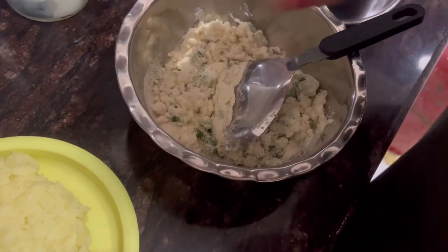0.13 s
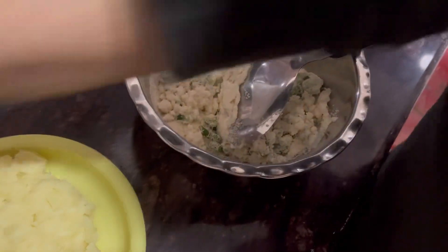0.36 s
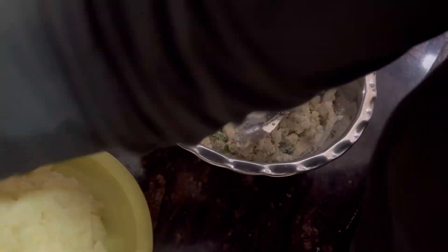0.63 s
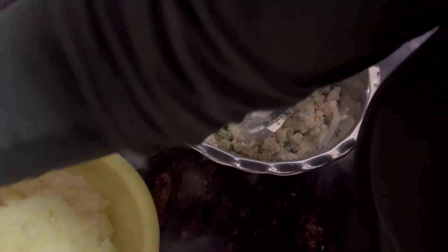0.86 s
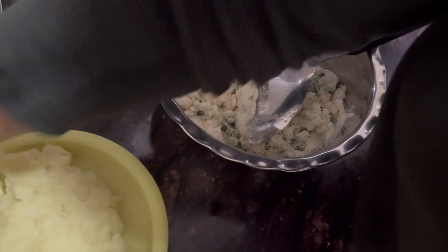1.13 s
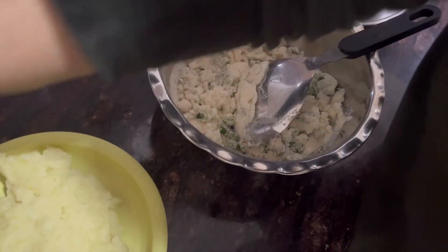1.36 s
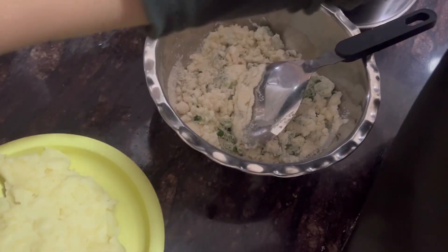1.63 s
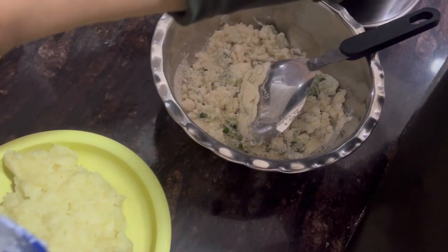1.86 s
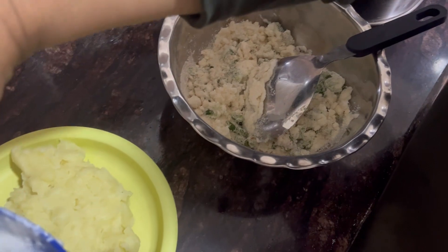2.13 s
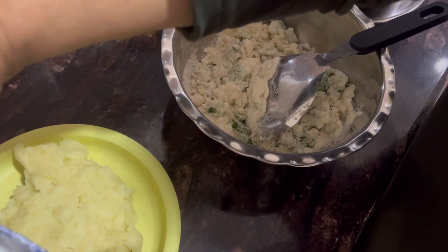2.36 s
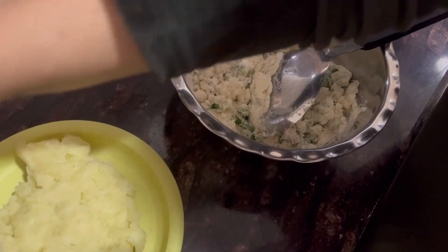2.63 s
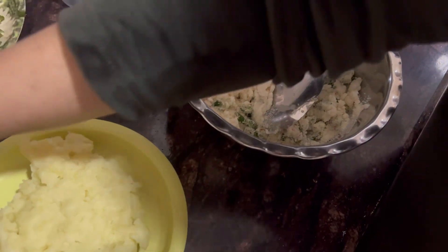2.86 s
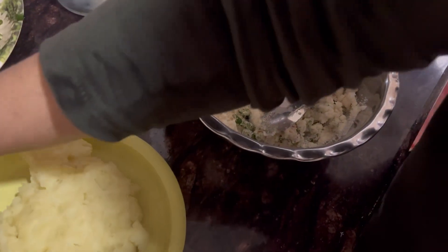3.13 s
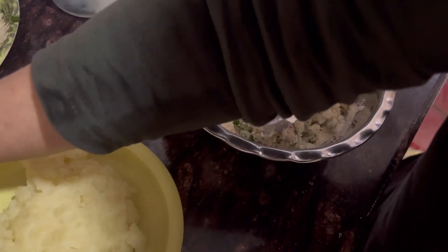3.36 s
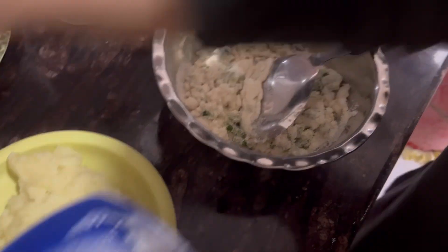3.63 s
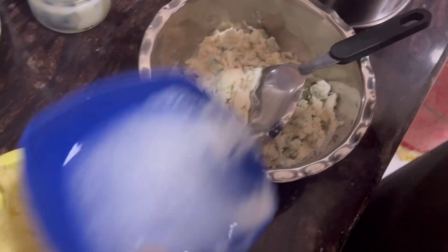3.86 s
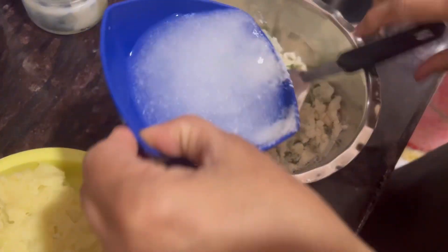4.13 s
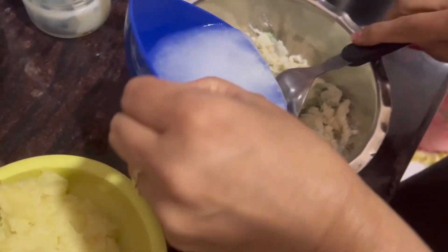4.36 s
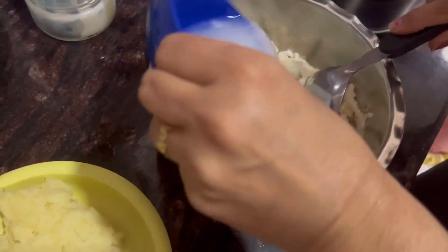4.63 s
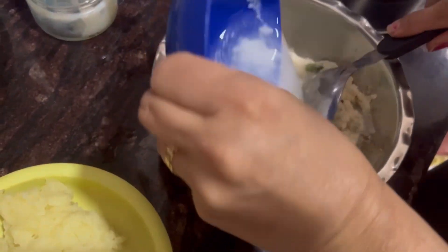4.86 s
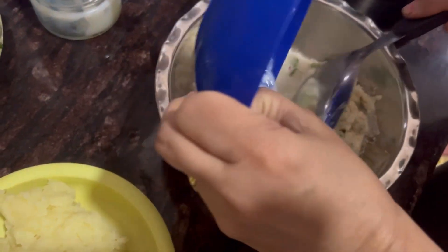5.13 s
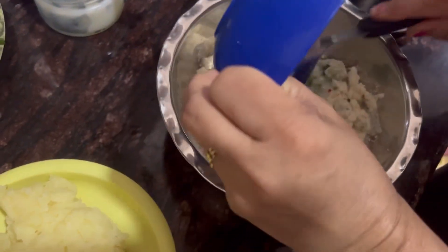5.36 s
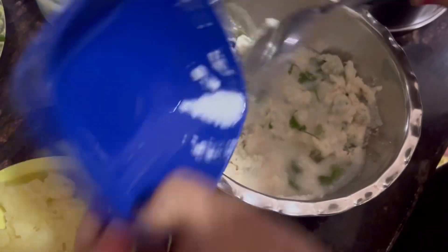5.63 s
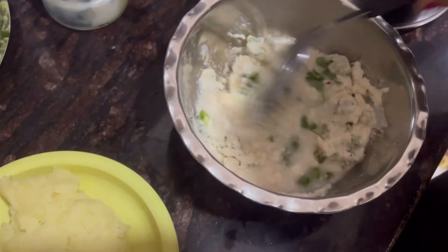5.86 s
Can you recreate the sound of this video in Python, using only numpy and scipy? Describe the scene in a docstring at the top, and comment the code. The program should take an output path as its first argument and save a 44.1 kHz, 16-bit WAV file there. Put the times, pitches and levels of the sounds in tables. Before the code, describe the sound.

In a small hard kitchen, vessels are handled near the microphone. First comes a sharp metallic knock, then a lighter cup clink, a sharp dull clack and a thin, fizzy trickle with a short squeak. Later a steel lid is struck, a spoon scrapes and taps faintly in the bowl, liquid plops in again, and containers thump on stone. Soft pot bubbling and low rumble run underneath.

```python
"""A hard steel clink and knock at once, close by on a stone counter: modes rung by blows, noise bursts, clacks.
Under it from the start: a simmering pot (resonant grains, swelling tones), rumble, rubbing and rustle (noise).
Then a cup clinks, liquid trickles (short tones, ticks, grains of fizz) and a dragged bowl squeaks (stick-slip
partials); a spoon rubs and taps, a lid is struck, thuds and pours recur. A hard-walled room echoes it (noise tail)."""
import sys
import numpy as np
from scipy import signal
from scipy.fft import rfft, irfft, next_fast_len
from scipy.io import wavfile

SR = 44100
rng = np.random.default_rng(int(sys.argv[2]) if len(sys.argv) > 2 else 0)


def elevation(decibels):
    """Turn decibel levels (scalar or array-like) into linear amplitude ratios."""
    levels = np.asarray(decibels, float)
    return 10 ** (levels / 20)


def inscribe(sig):
    """Save sig as 16-bit PCM at rate SR to the path in sys.argv[1].

    A 1-D sig is mono; a 2-D sig holds one channel per row.
    Samples are clipped to [-1, 1] before scaling.
    """
    pcm = np.round(np.clip(np.atleast_2d(sig).T, -1, 1) * 32767)
    wavfile.write(sys.argv[1], SR, pcm.astype(np.int16))


N = 264114

# noise colours of rumble, hiss and vessels rubbing on stone: f/Hz, relative density/dB per Hz
RUMBLE_COLOUR = [(30, -28), (60, -9), (115, 1), (170, -11), (270, -11), (450, -7), (620, -11.5), (800, -21)]
HISS_COLOUR = [(2600, 6), (4000, -13.5), (5000, -3), (7000, 1.5), (9000, -7), (12000, -2), (16000, -12.5)]
RUB_COLOUR = [(600, 9), (900, 5.5), (1300, -0.5), (1700, -4.5), (2300, -1.5), (3300, -12), (4300, -9.5)]
# share of diffuse sound common to both sides: f/Hz, share/0-1
COMMON_SHARE = [(60, 1), (200, 0.96), (500, 0.76), (1200, 0.02), (3000, 0), (7000, 0.8), (12000, 1)]
# phase by which the left port leads: f/Hz, phase/rad
PORT_LEAD = [(200, 0), (340, -.3), (690, -2.6), (1290, -.2), (1980, .1), (3190, -1.3), (4050, -.7),
             (4910, -2.2), (5600, 0), (7400, -.1), (9400, -1.1), (11900, -2.7), (14000, -2.85),
             (16200, -3.5)]
# decay of the kitchen: f/Hz, t60/s
ROOM_T60 = [(100, 1.4), (1000, 0.63), (4000, 0.47), (10000, 0.22)]
# shifts of vessels by hand: t/s, time to fade 20 dB/s, rubbing level/dB, low thrum through the stone level/dB
HAND_SHIFTS = [(0.0, 0.26, -42, -32.5), (.27, 0.42, -52, -41), (.7, 0.37, -51.5, -44),
               (1.05, 0.6, -60, -50.5), (1.49, 0.1, -53, -59), (1.861, .15, -40, -50),
               (2.04, 0.1, -50, -57.5), (2.44, 0.03, -60, -57), (2.91, 0.6, -69, -56),
               (3.212, 0.33, -41, -45.5), (3.451, 0.98, -52.5, -53.5), (4.14, 0.27, -54.5, -52.5),
               (4.45, 0.23, -58, -51), (4.76, 0.9, -57, -48.5), (5.14, 0.54, -54, -56),
               (5.5, 0.4, -63, -46), (5.819, 0.2, -50.5, -50.5)]
# rustle of sleeve and skin near the microphone: t/s, relative level/dB
SLEEVE_RUSTLE = [(0, -67), (.46, -67), (.8, -74), (1.13, -72), (1.37, -67.5), (1.57, -83.5), (2.6, -71.5),
                 (2.92, -79), (3.3, -69), (3.54, -76.5), (3.87, -69.5), (4.09, -74.5), (4.19, -63),
                 (4.3, -71), (5.6, -70), (5.77, -57.5), (5.99, -63)]
# flow of each pour, as fizz: t/s, relative level/dB
POUR_FLOWS = [
    [(1.63, -85), (1.75, -54.5), (1.83, -63.5), (1.93, -47), (2.05, -56.5), (2.2, -57.5), (2.35, -65),
     (2.48, -60.5), (2.64, -82.5)],
    [(4.4, -76), (4.57, -61.5), (4.69, -62.5), (4.9, -52), (5.0, -57.5), (5.14, -58), (5.29, -70),
     (5.45, -76.5)],
]
# large bubbles in the pot, and at 3.208 s the low tone of the blow on the lid: t/s, peak level/dB, f/Hz
SWELLING_TONES = [(.603, -44, 478), (.699, -33, 467), (1.053, -36, 443), (1.156, -37.5, 433),
                  (1.434, -38.5, 465), (1.472, -41, 482), (1.647, -41.5, 483), (1.782, -42, 457),
                  (2.247, -43.5, 512), (2.411, -39.5, 467), (2.474, -38, 455), (2.54, -35, 468),
                  (2.584, -41, 449), (2.686, -43.5, 439), (2.75, -44, 454), (2.905, -37, 477),
                  (3.208, -26.5, 557), (3.25, -38, 417), (3.467, -36.5, 454), (3.631, -41, 464),
                  (3.76, -39, 428), (3.939, -35.5, 450), (4.322, -42, 465), (4.439, -41, 480),
                  (4.72, -35.5, 449), (4.813, -41.5, 444), (4.968, -38, 462), (5.02, -37, 467),
                  (5.392, -36.5, 483), (5.469, -38, 435), (5.675, -41, 450), (5.858, -30.5, 405)]
# thuds on the counter: t/s, relative level/dB
COUNTER_THUDS = [(0.011, -27), (0.264, -30), (0.291, -27.5), (1.485, -38), (3.214, -30), (4.069, -37.5),
                 (4.093, -40), (4.483, -33.5), (5.491, -22), (5.791, -32.5), (5.857, -19.5), (5.882, -28)]
# modes of the counter: f/Hz, relative level/dB, t60/s
COUNTER_MODES = [(70, -14, 0.2), (113.7, -2, 0.44), (161.3, -8.5, 0.38), (230.7, -7.5, 0.33),
                 (280, -6, .15), (385, -6, 0.077), (800, -16.5, 0.12)]
# hard contacts: t/s, length/s, f/Hz, peak level/dB
HARD_CONTACTS = [(.0131, 0.0034, 1270, -8), (0.014, 0.0026, 8400, -26), (1.486, 0.0023, 920, -23.5),
                 (1.4858, 0.0018, 3800, -27.5), (2.913, 0.0092, 1395, -50.5)]
# blows on the steel bowl: t/s, relative level/dB
BOWL_HITS = [(0.014, -7), (0.031, -18)]
# modes of the bowl: f/Hz, relative level/dB, t60/s
BOWL_MODES = [(810, -9.5, 0.055), (1047, -17.5, 0.2), (1293, -19.5, .1), (1582, -17.5, 0.13),
              (2292, -15, 0.11), (3157, -21, 0.14), (3950, -28.5, 0.26), (4610, -33, 0.4), (5580, -36, .1)]
# dull knocks: t/s, level/dB, f/Hz that scales the noise band, t60/s, bright snap relative to body/dB
DULL_KNOCKS = [(0.016, -9, 1271, 0.069, -29), (0.255, -29, 637, 0.04, -39), (0.29, -25.5, 598, 0.086, -17),
               (0.301, -34.5, 651, 0.059, -23), (0.704, -22, 1595, 0.023, -21),
               (1.022, -38, 643, 0.12, -19), (1.052, -33.5, 1230, 0.13, -18),
               (1.486, -12.5, 1070, 0.028, -3.5), (2.915, -44, 635, 0.031, -26),
               (3.208, -16, 1530, 0.11, -29.5), (3.222, -23.5, 3810, 0.029, -9),
               (4.128, -36.5, 1470, 0.043, -13), (4.898, -22, 1194, 0.022, 0),
               (4.904, -19, 910, 0.044, -27), (5.278, -27.5, 1160, 0.073, 3.5),
               (5.484, -35.5, 794, 0.072, -22.5), (5.857, -35.5, 786, 0.069, -21)]
# blows on the steel cup: t/s, relative level/dB
CUP_HITS = [(0.7, -17), (0.706, -14.5)]
# modes of the cup: f/Hz, relative level/dB, t60/s
CUP_MODES = [(1295, -7.5, 0.03), (1532, -11.5, 0.049), (1605, -3, 0.13), (2235, -9, 0.019), (2883, -18, .1),
             (3490, -6, 0.071), (3900, -4.5, 0.082), (4410, -15, 0.15), (7480, -19, 0.11)]
# single splashes: t/s, level/dB, starting f/Hz
SPLASHES = [(1.6713, -40.5, 5980), (1.6997, -45.5, 2630), (1.7017, -42.5, 5200), (1.7316, -34, 7230),
            (1.7351, -38.5, 1920), (1.7371, -40, 3860), (1.7631, -32, 6090), (1.7975, -37.5, 7240),
            (1.8444, -31, 3830), (1.8618, -34, 3770), (1.8903, -35.5, 7640), (1.9077, -36.5, 6940),
            (1.9207, -28, 6670), (1.9242, -31.5, 3640), (1.9472, -38.5, 5610), (1.9706, -30, 4030),
            (1.9726, -31.5, 7450), (1.9931, -36, 3580), (2.01, -37, 5320), (2.0297, -35.5, 1900),
            (2.031, -38.5, 4200), (2.0561, -39, 2380), (2.0614, -38.5, 7340), (2.0736, -38, 2060),
            (2.0739, -35, 3920), (2.0858, -30, 3760), (2.1215, -39, 2080), (2.1532, -38.5, 6740),
            (2.1549, -39, 1980), (2.1689, -35.5, 1883), (2.1841, -28.5, 8140), (2.1913, -39.5, 2300),
            (2.2056, -38, 3950), (2.2684, -47, 8060), (2.2994, -34.5, 8650), (2.3011, -45.5, 2750),
            (2.3303, -36.5, 7890), (2.3822, -33.5, 4730), (2.4143, -45.5, 1890), (2.4263, -43.5, 2440),
            (2.4532, -37, 1600), (2.4964, -23, 8670), (2.5358, -38.5, 5540), (2.6111, -36.5, 6280),
            (4.3288, -52, 8170), (4.5034, -45.5, 3710), (4.5408, -45.5, 8900), (4.5617, -44, 8370),
            (4.654, -46.5, 9520), (4.7159, -37, 3026), (4.7408, -35, 3370), (4.778, -37.5, 1410),
            (4.8281, -37, 6500), (4.8381, -38.5, 4100), (4.8481, -38.5, 3330), (4.89, -34.5, 7670),
            (4.896, -25, 894), (4.904, -34, 2660), (4.948, -40, 1180), (4.9698, -44, 6310),
            (4.9888, -42, 2580), (4.9987, -40, 3350), (5.031, -42.5, 2290), (5.0611, -42.5, 6850),
            (5.078, -40.5, 1450), (5.106, -28.5, 3540), (5.1389, -37, 3464), (5.1778, -41, 4160),
            (5.179, -33, 1148), (5.2113, -43.5, 3490), (5.258, -41, 2037), (5.2781, -37, 7500),
            (5.279, -28, 1153), (5.6577, -48, 8680), (5.7211, -49, 8030), (5.9147, -39.5, 8100)]
# squeaks of the bowl: t/s, length/s, mean slip rate/Hz, relative level/dB
BOWL_SQUEAKS = [(1.849, 0.052, 650, -30), (1.936, 0.016, 655, -42)]
# spoon rubbing along the bowl: start t/s, hold after the grip/s, level/dB
SPOON_RUBS = [(2.903, 0.039, -66.5), (3.995, 0.045, -67), (4.095, 0.11, -62.5), (4.375, 0.037, -67),
              (4.484, .1, -65), (5.55, 0.036, -62), (5.711, 0.23, -64)]
# light taps of the spoon: t/s, relative level/dB
SPOON_TAPS = [(4.1043, -50), (4.2238, -41), (4.4922, -48), (5.5633, -57.5), (5.7249, -49.5), (5.905, -40.5)]
# modes of the spoon: f/Hz, relative level/dB, t60 when tapped/s
SPOON_MODES = [(1293, -14.5, 0.069), (1662, 1.5, 0.075), (2300, -16, 0.1), (2794, -18.5, 0.13),
               (3155, -11, 0.21), (4600, -13, 0.16), (5740, -14.5, 0.083)]
# blows on the steel lid: t/s, relative level/dB
LID_HITS = [(3.2079, -22), (3.222, -26)]
# modes of the lid: f/Hz, relative level/dB, t60/s
LID_MODES = [(1006, 4, 0.052), (1320, -1.5, 0.087), (1477, 7.5, 0.024), (1695, -0.5, 0.16), (1820, 0, 0.1),
             (2380, -10, 0.11), (3117, -8, 0.071), (3824, -1, 0.1), (4330, 7, 0.055), (10100, -26, 0.13),
             (7553, -12, 0.18), (8500, -33, 0.1), (1766, -16, 1), (1970, -18.5, 0.69), (3076, -25, 1),
             (3620, -30.5, .9), (4250, -37, 0.67)]

# house and street; faintest rubbing; rise of a shift
RUMBLE_DB, STILL_DB, SHIFT_RISE_S = -54.5, -78, 0.033
HISS_SPLIT_DB = -66   # rustle or flow level above which hiss breaks into fizz
# small bubbles before the low-pass, their waver, swell of a large bubble
SIMMER_DB, SIMMER_WAVER_DB, BUBBLE_SWELL_S = -54, 2.0, .0053
STRIKE_SPREAD_DB = 1.5   # spread of a mode's strength from blow to blow
SMALL_DROPS_DB = 2   # relative to the flow
# splash t60 at 1 kHz, power of pitch that shortens it, tick relative to tone
DROP_T60_S, DROP_SHORTENING, TICK_DB = .036, .33, -14
GRIP_S, LET_GO_DB_PER_S = 0.015, 152   # spoon stroke


def rms_one(x):
    """Scale to rms 1."""
    return x / np.sqrt(np.mean(x ** 2) + 1e-20)


def in_time(rows, outside=None):
    """Columns of a curve at every sample."""
    s, *columns = np.transpose(rows)
    return [np.interp(np.arange(N) / SR, s, c, outside, outside) for c in columns]


def at_hz(points, hz):
    """Read a spectrum on a log axis."""
    point_hz, value = np.transpose(points)
    return np.interp(np.log(hz + 1), np.log(point_hz + 1), value)


def drift(rate_hz):
    """Slow random curve of rms 1: noise through two equal poles, at SR / 40."""
    r = np.exp(-80 * np.pi * rate_hz / SR)
    slow = signal.lfilter([1], [1, -2 * r, r * r], rng.standard_normal(N // 40 + 2002))[2000:]
    return np.interp(np.arange(N) / 40, np.arange(len(slow)), rms_one(slow))


def ring(clicks, hz, t60_s):
    """Two-pole resonance: a unit click sets a decaying sine of height 1 ringing."""
    r, w = elevation(-60 / (t60_s * SR)), 2 * np.pi * hz / SR
    return signal.lfilter([0, np.sin(w)], [1, -2 * r * np.cos(w), r * r], clicks + 1e-18)


def soften(x, hz):
    """One-pole low-pass."""
    r = np.exp(-2 * np.pi * hz / SR)
    return signal.lfilter([1 - r], [1, -r], x)


def steep(x, hz):
    """Sharp low-pass."""
    return signal.sosfilt(signal.butter(6, hz, fs=SR, output="sos"), x)


def band_pass(x, order, low_hz, high_hz):
    """Butterworth band-pass."""
    return signal.sosfilt(signal.butter(order, [low_hz, high_hz], "band", fs=SR, output="sos"), x)


def add(out, s, sound):
    """Mix a short sound in at a time."""
    at = round(s * SR)
    out[at:at + len(sound)] += sound[:N - at]


def to_sides(noises, hz):
    """Two sides from three noises: the first is common, by the share at this pitch."""
    share = np.clip(at_hz(COMMON_SHARE, hz), 0, 1)
    return np.sqrt(share) * noises[0] + np.sqrt(1 - share) * noises[1:]


def banded_noise(colour, patchy_db):
    """Half-octave bands of stereo noise, each flickering a little; rms 1."""
    out, together = 0, .4 * drift(5)
    white = rng.standard_normal((2, 3, N))
    octaves = np.log2(colour[-1][0] / colour[0][0])
    edges = colour[0][0] * 2 ** np.arange(0, octaves + .3, .5)
    for k, (low, high) in enumerate(zip(edges, np.minimum(edges[1:], 17000))):
        noises = band_pass(white[k % 2], 2, low, high)   # neighbours use separate noise
        hz = np.sqrt(low * high)
        gain = elevation(at_hz(colour, hz) + patchy_db * (together + drift(14)))
        out = out + gain * to_sides(noises, hz)
    return rms_one(out)


def grains(per_s, low_hz, high_hz, t60_cycles, spread_db, tilt):
    """Random clicks dealt to sixteen short resonances; rms 1."""
    happens = rng.random(N) < per_s / SR
    sizes = elevation(spread_db * np.minimum(rng.exponential(1, N), 4)) * happens
    dealt = rng.integers(0, 16, N)
    pitches = np.geomspace(low_hz, high_hz, num=16)
    return rms_one(sum(hz ** tilt * ring(sizes * (dealt == k), hz, t60_cycles / hz)
                       for k, hz in enumerate(pitches)))


def struck(blows, modes, gain_db, split):
    """Each blow strikes every mode with its own strength; out of round, modes are close pairs that beat."""
    blow_s, blow_db = np.transpose(blows)
    at, out = np.array([round(s * SR) for s in blow_s]), np.zeros(N)
    chance = rng.standard_normal((len(blows), len(modes)))
    for k, (hz, level_db, t60) in enumerate(modes):
        clicks = np.zeros(N)
        late = round(SR / 3000 * (k % 3))   # the blow reaches parts of the wall one after another
        strength_db = blow_db + level_db + gain_db + STRIKE_SPREAD_DB * chance[:, k]
        clicks[at + late] = (-1) ** k * elevation(strength_db)
        rocking = elevation(2.7 * drift(25))   # the vessel rocks and is damped unevenly
        out += rocking * (ring(clicks, hz, t60) + 0.33 * ring(clicks, hz * (1 + split), t60))
    return out


def stroke(s, rise_s, hold_s, fall_db_per_s):
    """Gain that rises, holds and dies away."""
    t = np.arange(N) / SR - s
    return np.clip(t / rise_s, 0, 1) * elevation(-fall_db_per_s * np.clip(t - rise_s - hold_s, 0, None))


def handling():
    """Shifts rub the counter and set the stone thrumming over a steady rumble; powers add."""
    power = 0
    for s, fade_s, rub_db, thrum_db in HAND_SHIFTS:
        gain = stroke(s - SHIFT_RISE_S, SHIFT_RISE_S, 0, 20 / fade_s)
        power = power + gain ** 2 * elevation([[2 * rub_db], [2 * thrum_db]])
    rub, rumble = np.sqrt(power + elevation([[2 * STILL_DB], [2 * RUMBLE_DB]]))
    low = steep(banded_noise(RUMBLE_COLOUR, patchy_db=2.5), 660)
    return rumble * low + rub * banded_noise(RUB_COLOUR, patchy_db=3.0)


def hiss(level):
    """Faint rustle is smooth noise; what is louder breaks into clumps of fizz. Returns both."""
    smooth = np.minimum(level, elevation(HISS_SPLIT_DB))
    excess = np.sqrt(level ** 2 - smooth ** 2)
    fizz = grains(900 * elevation(10.0 * drift(40)), 3300, 16000, 25.0, 1.5, tilt=1.2)
    return elevation(3.5) * smooth * banded_noise(HISS_COLOUR, patchy_db=3.2), elevation(3.0) * excess * fizz


def simmer():
    """Bubbles swell and burst under the pot's lid, whose hollow rings near one pitch; at 3.208 s, the low tone
    of the blow on the lid."""
    small = steep(grains(90, 440.5, 580, 15.0, 2.2, tilt=0), 640)
    out = elevation(SIMMER_DB + SIMMER_WAVER_DB * drift(8)) * small
    t = np.arange(3000) / SR
    swell = t / BUBBLE_SWELL_S * np.exp(1 - t / BUBBLE_SWELL_S)
    for s, db, hz in SWELLING_TONES:
        add(out, s, elevation(db) * np.sin(2 * np.pi * hz * t) * swell)
    return out


def thuds():
    """Containers set down ring the low modes of the stone top, softened above 900 Hz."""
    return soften(struck(COUNTER_THUDS, COUNTER_MODES, -10, 0.054), 900)


def clacks():
    """The wall flexes a few times while the contact lasts, then is held still."""
    out = np.zeros(N)
    for s, length, hz, db in HARD_CONTACTS:
        t = np.arange(round(length * SR)) / SR
        add(out, s, elevation(db) * np.sin(2 * np.pi * hz * t) * np.sqrt(np.sin(np.pi * t / length)))
    return out


def bowl():
    """Blows ring the modes of the steel bowl."""
    return struck(BOWL_HITS, BOWL_MODES, -5, 0.0098)


def knocks():
    """Noise burst around the pitch of the struck thing, with a shorter bright snap."""
    out, t = np.zeros(N), np.arange(6000) / SR
    noises = rng.standard_normal((len(DULL_KNOCKS), len(t)))
    for (s, db, hz, t60, snap_db), noise in zip(DULL_KNOCKS, noises):
        body = rms_one(band_pass(noise, 1, hz / 4.2, hz * 0.88)) * elevation(-60 * t / t60)
        bright = rms_one(steep(np.diff(noise, 2, prepend=[0, 0]), 7800))
        snap = bright * elevation(snap_db - 60 * t / 0.0083)
        add(out, s, elevation(db - 12.5) * (body + snap))   # 12.5 dB: room for noise peaks
    return out


def cup():
    """Blows ring the modes of the steel cup."""
    return struck(CUP_HITS, CUP_MODES, -15, 0.0086)


def water(flow):
    """Splashes are rough, slightly rising tones with a sharp tick, over clumps of smaller drops."""
    out, t = np.zeros(N), np.arange(2500) / SR
    for (s, db, hz), noise in zip(SPLASHES, rng.standard_normal((len(SPLASHES), len(t)))):
        wobble = 1 + 0.89 * rms_one(soften(noise, 0.04 * hz))
        t60 = DROP_T60_S * (hz / 1000) ** -DROP_SHORTENING
        tone = np.sin(2 * np.pi * hz * t * (1 + 0.5 * t)) * wobble * elevation(-60 * t / t60)
        tick = elevation(TICK_DB) * np.diff(noise, prepend=0) * elevation(-60 * t / .008)
        add(out, s - .001, elevation(db) * (tone + tick) * np.minimum(t / 0.0014, 1))
    small = grains(500 * elevation(12.0 * drift(25)), 1200, 6000, 15.0, 4.9, tilt=0.79)
    return out + elevation(SMALL_DROPS_DB) * flow * small


def squeak():
    """Stick and slip at a wavering rate: a fundamental, a strong octave, faint upper partials."""
    out, t = np.zeros((2, N)), np.arange(N) / SR
    waver, flutter = drift(60), elevation(.9 * drift(90))
    for s, length, hz, db in BOWL_SQUEAKS:
        turn = 2 * np.pi * np.cumsum(hz * (1 + 0.00723 * waver)) / SR
        grip = np.clip((t - s) / 0.0095, 0, 1) * elevation(-600 * np.clip(t - s - length, 0, 1))
        low = np.sin(turn) * elevation([[8], [-10.5]])   # the low tone arrives from the left
        upper = np.sin(2 * turn + 0.99) + elevation(-23) * np.sin(3 * turn) + elevation(-29) * np.sin(4 * turn)
        high = upper * elevation([[4.5], [1.5]])
        out += elevation(db) * grip * flutter * (low + high)
    return out


def spoon():
    """Light taps, and dense tiny catches of the rubbing edge, ring the spoon."""
    catches = rng.standard_normal(N) * elevation(5.3 * drift(30))
    # rubbed modes die in 0.45 of the tapped t60
    sung = rms_one(sum(elevation(db) * ring(catches, hz, 0.45 * t60) for hz, db, t60 in SPOON_MODES))
    pressure = sum(elevation(db) * stroke(s, GRIP_S, hold, LET_GO_DB_PER_S) for s, hold, db in SPOON_RUBS)
    return struck(SPOON_TAPS, SPOON_MODES, -7, 0.0132) + sung * pressure


def lid():
    """Blows ring the modes of the steel lid."""
    return struck(LID_HITS, LID_MODES, -10, 0.012)


def kitchen(x):
    """Diffuse tail, partly common to both sides: octaves of noise that die at their own pace."""
    t, size, tail = np.arange(SR) / SR, next_fast_len(N + SR), 0
    white = rng.standard_normal((3, SR))
    for low in 60 * 2 ** np.arange(8):
        hz = low * np.sqrt(2)
        sides = to_sides(band_pass(white, 2, low, 2 * low), hz)
        tail = tail + sides * elevation(-60 * t / at_hz(ROOM_T60, hz))
    onset = np.clip((t - .004) / 0.004, 0, 1)
    tail = tail * onset / np.sqrt(np.sum(tail ** 2) / 2)
    return irfft(rfft(x, size) * rfft(tail, size), size)[:, :N]


def scene():
    """Everything on the counter, its echo and the steady room."""
    flow = sum(elevation(in_time(pour, -120)[0]) for pour in POUR_FLOWS)
    sleeve = elevation(in_time(SLEEVE_RUSTLE)[0])
    steel = bowl() + cup() + lid()
    hits = steel + spoon() + knocks() + clacks()
    rustle, fizz = hiss(np.hypot(flow, sleeve))
    near = water(flow) + fizz + simmer() + thuds()
    tone = squeak()
    echo = kitchen(elevation(-11.5) * hits + elevation(-14.0) * near + elevation(-25) * tone[0])
    return hits + near + tone + echo + handling() + rustle


def top_cut(x):
    """Nothing passes above the cut-off."""
    return signal.sosfilt(signal.butter(12, 16620, fs=SR, output="sos"), x)


def record(dry):
    """The bass is cut; two ports hear with a phase difference that changes with pitch."""
    size = next_fast_len(N + 4096)
    lead = at_hz(PORT_LEAD, np.fft.rfftfreq(size, 1 / SR))
    dry = signal.sosfilt(signal.butter(2, 48, "high", fs=SR, output="sos"), dry)
    turned = rfft(dry, size) * np.exp(.5j * lead * [[1], [-1]])   # half the lead on each side
    mix = irfft(turned, size)[:, :N]
    return top_cut(mix)


dry = scene()
out = record(dry)
inscribe(out)
```